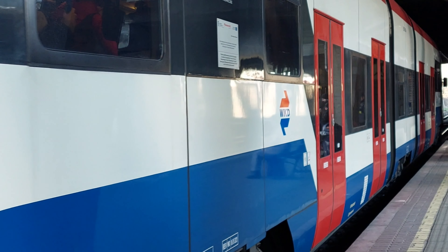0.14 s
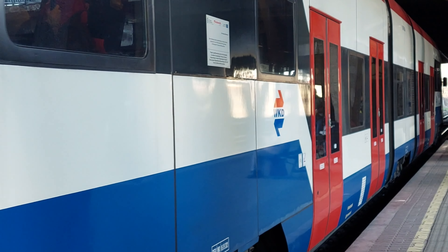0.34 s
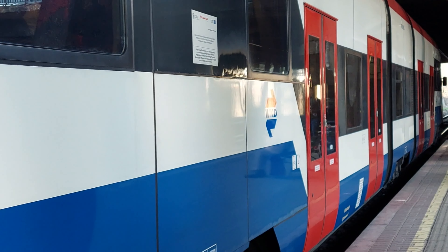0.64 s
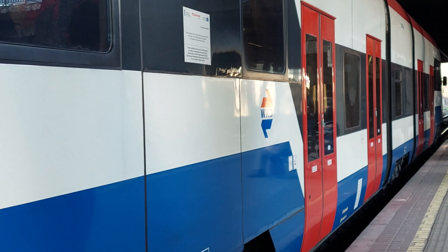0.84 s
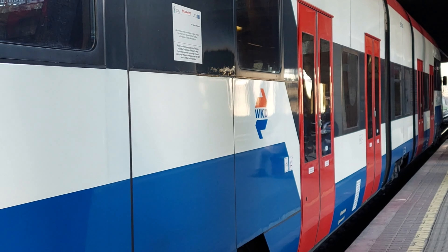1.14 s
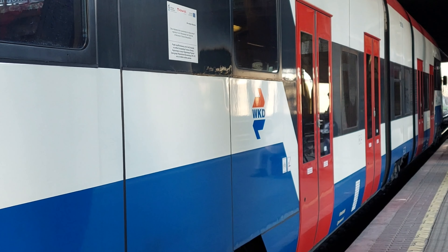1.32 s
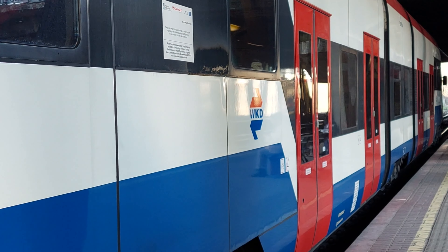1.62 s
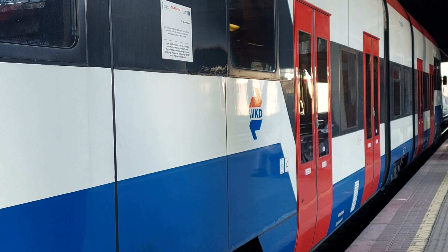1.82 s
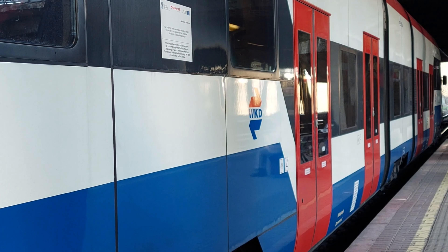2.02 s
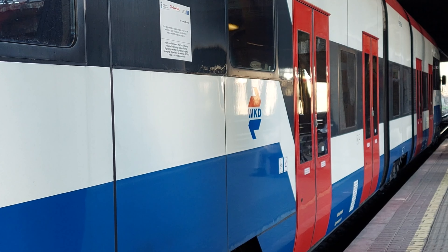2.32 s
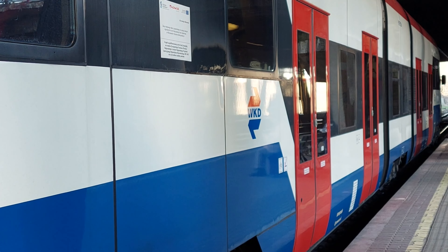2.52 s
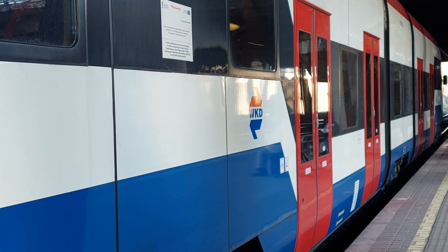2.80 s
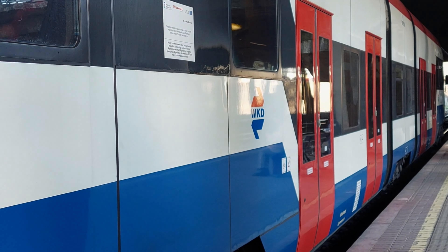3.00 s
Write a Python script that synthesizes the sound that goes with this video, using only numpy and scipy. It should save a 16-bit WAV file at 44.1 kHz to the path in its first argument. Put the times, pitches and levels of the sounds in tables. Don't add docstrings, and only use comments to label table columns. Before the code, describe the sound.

A very loud, high, wavering brake squeal from a train beside a close hand-held microphone fades before the stop; a dull low jolt, light rattles and one hollow knock follow over quiet machinery rumble.

```python
import sys
import numpy as np
from scipy import signal
from scipy.fft import rfft, irfft
from scipy.io import wavfile
from scipy.ndimage import uniform_filter1d

SR = 44100
rng = np.random.default_rng(int(sys.argv[2]) if len(sys.argv) > 2 else 0)


def undo_db(level):
    steps = np.asarray(level, float) / 20
    return 10 ** steps


def unload_audio(sound):
    columns = np.transpose(np.atleast_2d(sound))
    steps = np.round(np.clip(columns, -1, 1) * 32767)
    wavfile.write(sys.argv[1], SR, steps.astype(np.int16))


N = 138915
STOP_S = 1.92


def wander(width_hz):
    z = rng.standard_normal((2, N)) + 1j * rng.standard_normal((2, N))
    lowpass = 1 / (1 + (np.fft.fftfreq(N, 1 / SR) / width_hz) ** 4)
    z = np.fft.ifft(np.fft.fft(z) * lowpass)
    return z / np.sqrt(np.mean(abs(z) ** 2))


def evened(x):
    return x / np.sqrt(np.mean(x ** 2) + 1e-20)


def read(points, hz):
    f, value = np.transpose(points)
    return np.interp(np.log(hz + 1), np.log(f + 1), value)


def coloured(points, count):
    spectrum = rfft(rng.standard_normal((count, N)))
    return evened(irfft(spectrum * undo_db(read(points, np.fft.rfftfreq(N, 1 / SR))), N))


def modes(t, rows, fuzz, fuzz_hz, overtones=False):
    second_db, third_db, longest_edge_s, pan_db = -19, -25, .05, 3
    fast_fuzz, fast_times, port_apart = .45, 2.6, .5
    chance = wander(fuzz_hz) + fast_fuzz * wander(fast_times * fuzz_hz)
    common = np.sqrt(1 - port_apart ** 2) * chance[:1]
    chance = common + port_apart * chance[1:] * np.array([[1], [-1]])
    out = np.zeros((2, N))
    for start, end, first_hz, last_hz, db in rows:
        edge = min(longest_edge_s, (end - start) / 5)
        on = (t > start - edge) & (t < end + edge)
        u = t[on]
        gate = np.clip(np.minimum(u - start, end - u) / edge / 2 + .5, 0, 1) ** 2
        hz = np.interp(u, [start, end], [first_hz, last_hz])
        turn = np.exp(2j * np.pi * (first_hz * u[0] + np.cumsum(hz) / SR))
        swing = (1 + fuzz * np.roll(chance, rng.integers(N), axis=1)[:, on]) * turn
        tone = swing
        if overtones and start < STOP_S:
            tone = swing + undo_db(second_db) * swing ** 2 + undo_db(third_db) * turn ** 3
        out[:, on] += undo_db(db) * gate * tone.real
    return out * undo_db(np.array([[.5], [-.5]]) * pan_db)


# time in seconds, left level in dB, right level in dB, half width in seconds.
BRAKE_SWELLS = [(.025, -6.5, -16, 0.024), (.065, 0, -16.5, .03), (.095, -17, -10.5, 0.045),
                (.14, -8.5, -15, 0.018), (.178, -6.5, -15, 0.021), (.25, -9, -15.5, 0.035),
                (.278, -13, -9, 0.012), (.335, -7.5, -14, 0.052), (.37, -6, -10, 0.009),
                (.41, -5.5, -13, 0.028), (.432, -4.5, -11.5, 0.0057), (.475, -6.5, -13.5, 0.024),
                (.52, -2, -22, 0.028), (.545, -16, -18, .01), (.61, -8.5, -19, 0.042),
                (.655, -2, -12.5, 0.041), (.692, -8.5, -11.5, 0.0092), (.716, -10.5, -2.5, 0.0077),
                (.752, -5.5, -11, 0.018), (.82, -2, -13, 0.048), (.893, -3.5, -18, 0.043),
                (.925, -14, -12.5, .012), (.968, -9, -15.5, 0.023), (1.015, -2, -20, 0.049),
                (1.075, -10, -19.5, .03), (1.13, -9, -24, 0.04), (1.215, -6, -19.5, 0.026),
                (1.243, -11.5, -14, 0.008), (1.285, -13.5, -26, 0.045), (1.325, -16.5, -25.5, 0.029),
                (1.405, -18.5, -24, 0.028), (1.435, -19.5, -32, 0.029), (1.5, -28, -40, 0.026),
                (1.57, -54, -48, 0.016)]


def squeal(t):
    pitch_hz, sag_from_s, sag_hz_per_s, waver_hz = 6685, 1.0, 22, 5
    level_db, octave_db = 0.1, -33.5
    fuzz, fuzz_hz, right_fuzz = .13, 32, 2.5
    skirt_db, skirt_fall_db_per_s, skirt_hz, skirt_below_hz = -19, 10, 110, 90
    hz = pitch_hz - sag_hz_per_s * np.maximum(t - sag_from_s, 0) + waver_hz * wander(24)[:1].real
    turn = np.exp(2j * np.pi * np.cumsum(hz, axis=1) / SR)
    skirt = undo_db(skirt_db - skirt_fall_db_per_s * t) * wander(skirt_hz)
    skirt = skirt * np.exp(-2j * np.pi * skirt_below_hz * t)
    swing = (1 + (fuzz * wander(fuzz_hz) + skirt) * np.array([[1], [right_fuzz]])) * turn
    power = np.zeros((2, N))
    for s, left_db, right_db, half_width_s in BRAKE_SWELLS:
        power += undo_db(np.array([[left_db], [right_db]])) ** 2 * np.exp(-2 * ((t - s) / half_width_s) ** 2)
    level = undo_db(level_db) * np.sqrt(power)
    return np.sqrt(2) * level * (swing + undo_db(octave_db) * swing ** 2).real


# start in seconds, end in seconds, first pitch in Hz, last pitch in Hz, level in dB.
STEADY_MODES = [(.3, 1.25, 4896, 4896, -32), (-.1, .27, 4880, 4890, -33), (1.2, 1.49, 5510, 5500, -43),
                (.78, 1.03, 5730, 5790, -35), (1.2, 1.5, 5868, 5860, -39), (1.215, 1.42, 5095, 5095, -29),
                (1.42, 1.5, 5110, 5200, -32), (-.1, .28, 6378, 6372, -31), (.96, 1.12, 4896, 4896, -31),
                (1.2, 1.55, 4896, 4896, -44)]


def steady_wheels(t):
    return modes(t, STEADY_MODES, fuzz=.5, fuzz_hz=21, overtones=True)


# start in seconds, end in seconds, first pitch in Hz, last pitch in Hz, level in dB.
FLUTTERING_MODES = [(-.1, .27, 4815, 4790, -43), (-.1, .47, 5560, 5570, -33), (.2, .29, 5470, 5460, -29),
                    (.5, 1.2, 5500, 5520, -36), (.56, .8, 5660, 5735, -33), (.08, .75, 6530, 6500, -40),
                    (.82, 1.06, 6110, 6190, -52), (.28, .5, 6370, 6350, -45), (.3, .45, 5470, 5480, -33),
                    (.48, .55, 5700, 5730, -35)]


def fluttering_wheels(t):
    return undo_db(9.5) * modes(t, FLUTTERING_MODES, fuzz=.9, fuzz_hz=32, overtones=True)


# start in seconds, end in seconds, first pitch in Hz, last pitch in Hz, level in dB.
THIN_MODES = [(.25, 1.46, 8480, 8470, -50), (-.1, .3, 9512, 9512, -50), (-.1, .45, 11946, 11940, -47),
              (-.1, .5, 14142, 14100, -58), (-.1, .55, 10304, 10350, -54), (.1, .6, 12650, 12750, -56),
              (.2, .6, 13200, 13150, -54), (.6, 1.1, 10379, 10380, -60), (.6, 1.2, 12645, 12645, -60),
              (-.1, .8, 3100, 2970, -50)]


def thin_wheels(t):
    return undo_db(3.0) * modes(t, THIN_MODES, fuzz=1.0, fuzz_hz=30)


# start in seconds, end in seconds, first pitch in Hz, last pitch in Hz, level in dB.
PASSING_MODES = [(1.058, 1.086, 6830, 6835, -19), (.54, .59, 6520, 6520, -27), (.3, .36, 6510, 6520, -31),
                 (.4, .86, 4160, 4165, -52), (.89, 1.0, 5110, 5100, -50), (1.08, 1.17, 5210, 5190, -46),
                 (1.03, 1.2, 5790, 5830, -45), (1.22, 1.27, 5870, 5870, -35), (.8, 1.3, 14690, 14720, -57),
                 (1.0, 1.25, 10600, 10600, -57), (.25, .5, 12000, 12100, -56),
                 (.55, .95, 11350, 11420, -50), (1.03, 1.18, 8870, 8870, -62), (-.1, .4, 13100, 13100, -52)]


def passing_wheels(t):
    return modes(t, PASSING_MODES, fuzz=.5, fuzz_hz=30)


def swarm(t):
    count, low_hz, high_hz, until_s, hold_s = 30, 9400, 14300, 1.15, .3
    level_db, fall_db_per_s, spread_db = -52.5, 6, 7
    a, b, c, d = rng.random((count, 4)).T
    start = until_s * a ** 1.4 - .15
    end = start + hold_s * (.5 + c)
    hz = low_hz + (high_hz - low_hz) * b
    db = level_db - fall_db_per_s * start - spread_db * d
    rows = np.transpose([start, end, hz, hz + 120 * (d - .4), db])
    return modes(t, rows, fuzz=1.5, fuzz_hz=35)


# time in seconds, pitch in Hz, level in dB.
MOTOR_WHINE = [(0.0, 775.7, -35), (0.436, 748.4, -32), (0.478, 753.5, -41.5), (0.676, 732, -40.5),
               (0.728, 736.6, -34), (0.944, 721.5, -42.5), (1.0, 722, -52.5), (1.08, 719, -48.5)]


def motor(t):
    s, hz, db = np.transpose(MOTOR_WHINE)
    turn = np.exp(2j * np.pi * np.cumsum(np.interp(t, s, hz)) / SR)
    ports = np.array([[2.1], [1.5 * np.exp(-1.6j)]])
    level = np.sqrt(2) * undo_db(np.interp(t, s, db, right=-90))
    return level * ((1 + 0.46 * wander(9.03)) * turn * ports).real


# frequency in Hz, level in dB.
ROLLING_SPECTRUM = [(15, -25.5), (28, -7), (180, -9.5), (340, -18.5), (1700, -25), (3600, -29.5),
                    (5000, -37.5), (16000, -60)]
RESTING_SPECTRUM = [(15, -9.5), (28, -4), (130, -7.5), (320, -19), (900, -28), (3400, -36), (5500, -45.5),
                    (16000, -55.5)]
# pitch in Hz, bandwidth in Hz, level in dB.
MACHINE_HUMS = [(105, 22, -20), (210.7, 35, -1), (412.3, 82, -6)]
# frequency in Hz, left-right likeness from -1 to 1.
LIKENESS = [(60, 1), (240, 0.34), (950, -0.2), (3000, -0.01), (5500, -0.35), (9000, .93)]


def rolling_and_rest(t):
    rolling_db, resting_db, hum_db, roll_slope_db_per_s = -23.5, -20.5, -38, 1.5
    dip_s, dip_db, dip_low_hz, dip_high_hz = .042, -6, 400, 5000
    frames, hz = N // 256 + 5, np.fft.rfftfreq(1024, 1 / SR)
    s = np.arange(frames) * 256 / SR
    a, b, c, d, patches = rng.standard_normal((frames, 513, 5)).T
    patches = uniform_filter1d(patches, size=14, axis=0)
    patches = evened(uniform_filter1d(patches, size=8, axis=1))
    flicker = evened(uniform_filter1d(rng.standard_normal(frames), size=3))
    flicker = flicker * np.clip(hz / 6000, 0, 1)[:, None]

    same = np.clip(read(LIKENESS, hz), -1, 1)[:, None]
    left = a + 1j * b
    z = np.array([left, same * left + np.sqrt(1 - same ** 2) * (c + 1j * d)])

    def shape(points, level_db):
        db = read(points, hz)
        return (level_db + db - 10 * np.log10(np.mean(undo_db(db) ** 2)))[:, None]

    rolling = shape(ROLLING_SPECTRUM, rolling_db) + roll_slope_db_per_s * (STOP_S - s)
    resting = shape(RESTING_SPECTRUM, resting_db) + 1.9 * flicker
    field = np.where(s < STOP_S, rolling, resting)
    dip_band = ((hz > dip_low_hz) & (hz < dip_high_hz))[:, None]
    field += dip_db * ((s > STOP_S) & (s < STOP_S + dip_s)) * dip_band
    z = z * undo_db(field + 1.1 * patches)
    out = 10.0 * signal.istft(z, nperseg=1024, noverlap=768)[1][:, :N] / 513
    hums = np.zeros((1, N))
    for f, width_hz, db in MACHINE_HUMS:
        hums += undo_db(db) * (wander(width_hz / 2)[:1] * np.exp(2j * np.pi * f * t)).real
    return out + undo_db(hum_db) * hums


# time in seconds, level in dB.
JOLT_LEVEL = [
    (1.9, -45),
    (1.976, -20.5),
    (2.051, -13.5),
    (2.083, -24),
    (2.126, -28),
    (2.188, -17.5),
    (2.218, -41),
    (2.282, -23.5),
    (2.4, -34.5),
]
# frequency in Hz, density in dB per Hz.
JOLT_SPECTRUM = [(12, -30), (20, 10.5), (54, -13.5), (112, -3), (330, -24.5), (604, -38.5), (900, -43.5),
                 (1170, -62.5), (1980, -120)]


def jolt(t):
    s, db = np.transpose(JOLT_LEVEL)
    lumps = coloured(JOLT_SPECTRUM, count=2)
    level = undo_db(np.interp(t, s, db, left=-90, right=-90) + 1.5)
    return level * (lumps[0] + .15 * lumps[1] * [[1], [-1]])


# time in seconds, peak in dB, length in seconds, treble in dB.
RATTLE_HITS = [(1.96, -30, 0.0277, -2.5), (1.987, -15, 0.038, -26), (2.0284, -27.5, 0.015, -5),
               (2.04, -22, 0.029, -13), (2.079, -25, 0.028, -10), (2.123, -19, 0.022, -20.5),
               (2.194, -29, 0.025, -13.5), (2.262, -33.5, 0.015, -6), (2.47, -49, 0.016, -3),
               (2.541, -52, 0.025, 2), (2.5705, -19, 0.015, -23), (2.6594, -36, 0.015, -11),
               (2.706, -22.5, 0.02, -33), (2.938, -28.5, 0.025, -11.5), (3.021, -25, 0.011, -13),
               (3.077, -30, 0.03, -12.5)]
# frequency in Hz, density in dB per Hz.
DULL_SPECTRUM = [(200, -19), (550, 4), (1300, -7.5), (4000, -13.5), (6000, -28)]
BRIGHT_SPECTRUM = [(3000, -29), (5000, -3), (10000, -1.5), (16000, -6.5)]


def rattles(t):
    dull, bright = coloured(DULL_SPECTRUM, count=2), coloured(BRIGHT_SPECTRUM, count=1)
    out = np.zeros((2, N))
    for s, db, length_s, treble_db in RATTLE_HITS:
        u = np.maximum(t - s, 0) / (length_s / 3.0)
        puff = undo_db(db - 14.0) * u * np.exp(1 - u)
        out += puff * (dull + 0.14 * dull[::-1] + undo_db(treble_db) * bright)
    return out


# start in seconds, end in seconds, first pitch in Hz, last pitch in Hz, level in dB.
REST_SQUEAKS = [(2.39, 2.46, 4830, 4840, -66), (2.478, 2.505, 4800, 4750, -58),
                (2.478, 2.505, 4500, 4520, -62), (2.66, 2.685, 4900, 4900, -62),
                (2.034, 2.05, 4400, 4400, -50), (2.565, 2.58, 3500, 3500, -58)]


def squeaks(t):
    return modes(t, REST_SQUEAKS, fuzz=3.3, fuzz_hz=90)


def ping(t):
    start_s, pitch_hz, level_db, t60_s = 2.081, 1155, -33, 0.04
    u = np.maximum(t - start_s, 0)
    return undo_db(level_db - 60 * u / t60_s) * np.sin(2 * np.pi * pitch_hz * u)


# start in seconds, end in seconds, first pitch in Hz, last pitch in Hz, level in dB.
REST_WHISTLE = [
    (2.11, 2.35, 4755, 4755, -60),
    (2.5, 3.2, 4755, 4750, -61),
    (2.61, 3.05, 4755, 4750, -56),
]


def whistle(t):
    return modes(t, REST_WHISTLE, fuzz=0.18, fuzz_hz=17)


# pitch in Hz, level in dB, t60 in seconds.
KNOCK_MODES = [(520, -29, .03), (780, -25, .035), (1120, -31, .025), (1500, -27, .022), (1950, -28, .02),
               (2600, -33, .015)]


def knock(t):
    u = np.maximum(t - 2.7075, 0)
    body = sum(undo_db(db - 60 * u / t60_s) * np.sin(2 * np.pi * hz * u) for hz, db, t60_s in KNOCK_MODES)
    return np.array([body * undo_db(1.5), np.roll(body, 4) * undo_db(-1.0)])


def scene():
    t = np.arange(N) / SR
    wheels = squeal(t) + steady_wheels(t) + fluttering_wheels(t) + thin_wheels(t)
    wheels = wheels + passing_wheels(t) + swarm(t)
    train = motor(t) + rolling_and_rest(t)
    settling = jolt(t) + rattles(t) + squeaks(t) + ping(t)
    return wheels + train + settling + whistle(t) + knock(t)


def low_pass(x):
    return signal.sosfilt(signal.butter(12, 20000, fs=SR, output="sos"), x)


def record(dry):
    sag, knee, ceiling = 0.01, .05, .98
    mask_db, mask_from_hz, edge_hz, edge_db = -57.5, 4950, 15800, -33.0
    bent = dry - sag * dry ** 3 - knee * np.clip(dry, -1, 1) ** 7
    clipped = np.clip(bent, -ceiling, ceiling)
    hz, _, z = signal.stft(clipped, SR, nperseg=1024, noverlap=768)
    size = uniform_filter1d(uniform_filter1d(abs(z), size=5, axis=1), size=3, axis=2)
    loudest = abs(z).max(axis=(0, 1))
    keep = np.clip(4.0 * np.log(size / (undo_db(mask_db) * loudest) + 1e-9) + .5, 0, 1)
    z = z * np.where((hz > mask_from_hz)[:, None], keep, 1)
    z = z * np.where(hz < edge_hz, 1, undo_db(edge_db))[:, None]
    mix = signal.istft(z, SR, nperseg=1024, noverlap=768)[1][:, :N]
    return low_pass(mix)


dry = scene()
out = record(dry)
unload_audio(out)
```